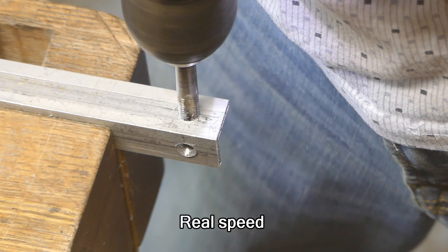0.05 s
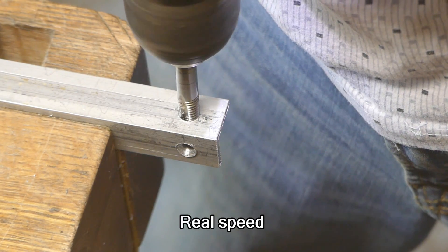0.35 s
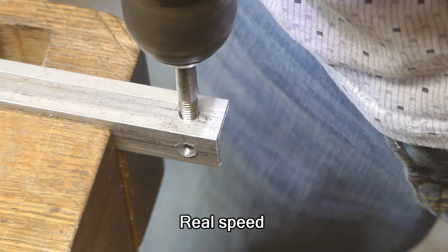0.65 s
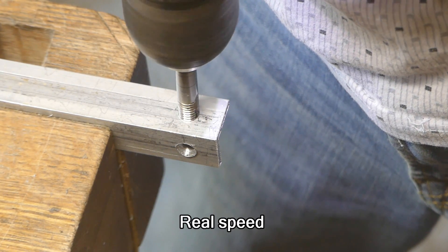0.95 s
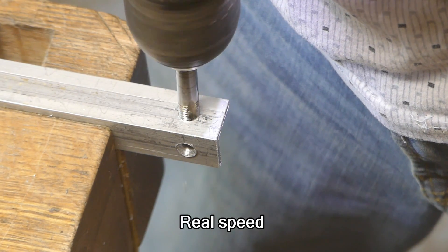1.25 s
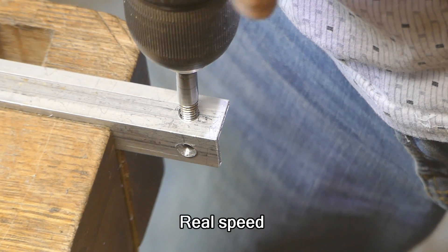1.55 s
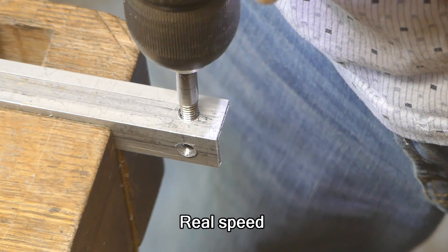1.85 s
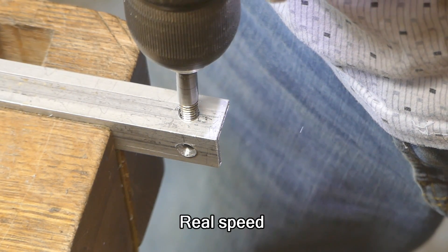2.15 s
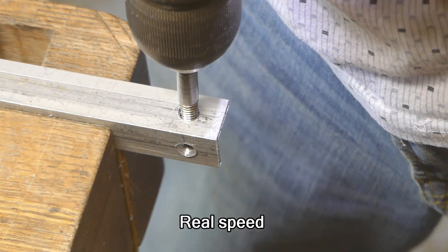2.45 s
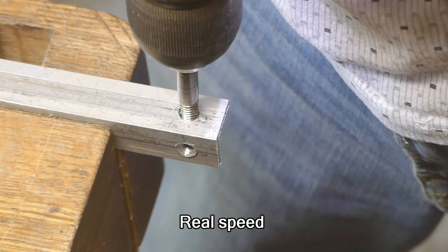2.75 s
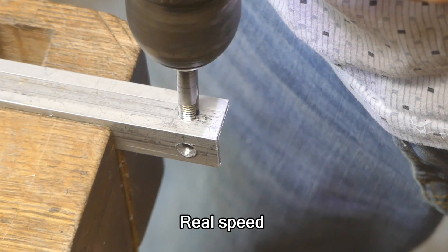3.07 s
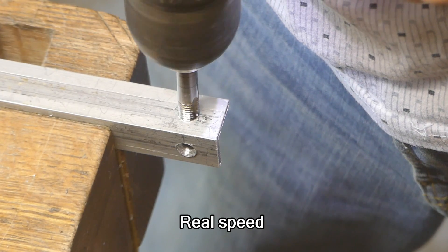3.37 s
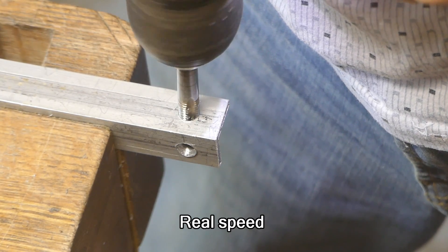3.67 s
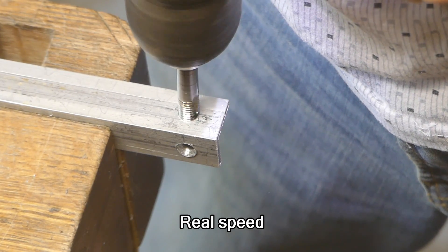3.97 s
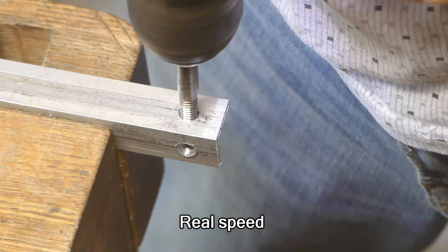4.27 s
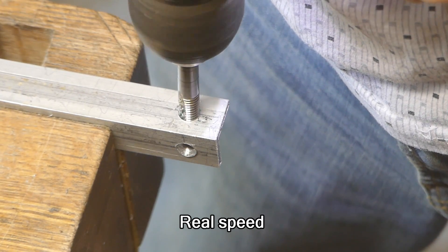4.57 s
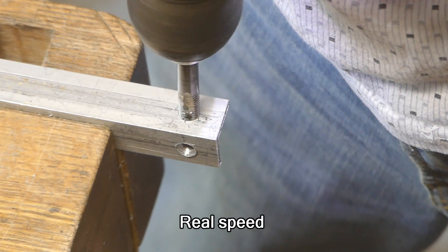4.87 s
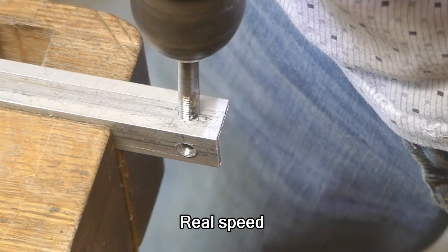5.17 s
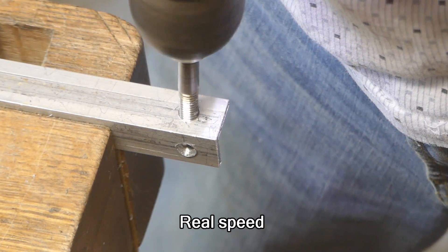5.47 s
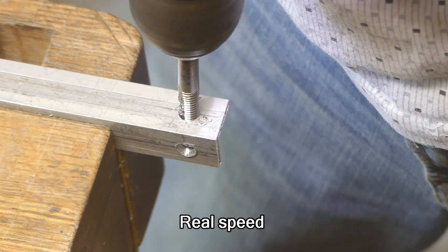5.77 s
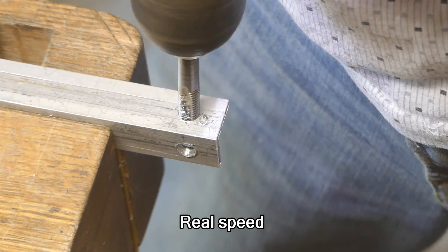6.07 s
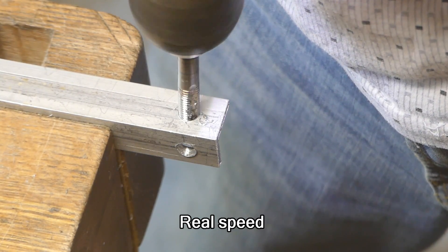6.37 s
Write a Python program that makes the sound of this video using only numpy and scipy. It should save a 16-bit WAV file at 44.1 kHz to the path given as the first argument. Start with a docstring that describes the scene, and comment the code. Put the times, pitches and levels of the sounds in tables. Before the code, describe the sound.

A handheld electric drill runs with a high, raspy whine as it taps a thread in metal, then stops quickly. In the short pause come a soft finger rub and a few plastic clicks over faint room noise. The drill backs out, slower at first, then flat out, the gears groaning and grinding about twice a second. The microphone is close, in a small workshop with a short echo.

```python
"""Cordless drill cutting a thread

Close by in a small workshop, a drill drives a tap (a thread cutter) into an aluminium bar and brakes.
A finger slides to the reversing switch and snaps it over. The drill backs out, first at part trigger,
then flat out. The gears whine over the scrape of the brushes. The tap drags about once in each turn
of the chuck, slowing the motor, and flat out each drag makes the gears groan."""
import sys
import numpy as np
from scipy import signal
from scipy.fft import rfft, irfft
from scipy.io import wavfile
from scipy.ndimage import uniform_filter1d

SR = 44100
rng = np.random.default_rng(int(sys.argv[2]) if len(sys.argv) > 2 else 0)


def wav_out(sig):
    """Save sig, one row per channel (or a flat mono array), as 16-bit PCM at SR to the path in sys.argv[1]."""
    wavfile.write(sys.argv[1], SR, np.round(np.clip(np.atleast_2d(sig).T, -1, 1) * 32767).astype(np.int16))


N = 287532
T, HZ = np.arange(N) / SR, np.fft.rfftfreq(N, 1 / SR)
RELEASE_S, BRAKE_S, RESTART_S, FULL_TRIGGER_S = 1.4, 1.433, 2.747, 3.82
# Settings in threes follow the three stages: running in, out at part trigger, out flat out.
FREE_TURNS_PER_S, DRILL_DB = (120.44, 87.4, 122.65), (-23.5, -21, -22)

# tones of the fan, commutator and gears: multiple of the motor speed, level/dB in each stage
WHINE_TONES = [(1, -38, -46, -39), (2.16, -40, -35, -31), (7, -25.5, -36, -38), (9.4, -30, -36, -28),
               (10, -17.5, -19, -19.5), (10.38, -21, -25, -19), (13, -25, -39, -40), (19, -25, -40, -24),
               (20, -19.5, -19, -16.5), (29, -21, -33, -40), (30, -16, -18, -16), (30.3, -18, -20, -22),
               (38, -21, -40, -35), (40, -10.5, -16.5, -16), (40.8, -22, -27, -23), (47, -19, -36, -40),
               (50, -17, -19, -23), (51, -21, -40, -33), (60, -21, -17, -24), (70, -20, -21, -26),
               (80, -13, -19, -18), (81, -20, -38, -27), (90, -16, -33, -27), (100, -16, -19.5, -32),
               (110, -17, -21, -37), (120, -27, -27, -40)]
# housing resonances that boost a tone passing through: f/Hz, width/Hz, boost/dB
HOUSING_BOOSTS = [(838, 22, 6.5), (3495, 35, 10), (4880, 70, 6.5), (5040, 45, 4.5)]
# tone colour of the scrape through the housing: f/Hz, level/dB in each stage
SCRAPE_COLOUR = [(30, -38.5, -45, -45), (100, -17.5, -22, -26), (255, -14.5, -13.5, -14),
                 (770, -13, -11, -9), (1320, -7, -6.5, -6), (2270, -8, -3, -1), (2600, -8, -6, -4),
                 (4040, -5, -2.5, -1), (4560, -2.5, 2, 0.5), (6100, -4.5, -5.5, -3), (8600, -12, -6, -5.5),
                 (9760, -6.5, -3, -0.5), (11670, -12.5, -8.5, -8.5), (13500, -9.5, -7, -7),
                 (16500, -24, -17, -20.5)]
# part of the scrape that repeats with each motor turn: f/Hz, share of power
REPEATING_SHARE = [(300, 0.11), (1000, 0.39), (4500, 0.11), (7500, 0.4), (15000, 1)]
# housing resonances rung by the running motor: f/Hz, width/Hz, level/dB
HOUSING_RINGS = [(479, 8.7, -29), (844, 4, -23), (3495, 20, -33), (4454, 44, -18)]
# the tap binds: hardest pull t/s, length/s, speed lost/(turns per s), surge in loudness/dB
TAP_DRAGS = [(0.01, 0.48, 1.82, 1.2), (0.388, 0.5, 0.97, 0), (0.982, .29, 0.78, 0.4), (1.51, .62, 1.9, 0.9),
             (2.919, .19, 1.73, 0.2), (3.199, 0.17, 0.72, .3), (3.55, 0.39, 3.87, -0.1),
             (4.125, 0.26, 5.22, 1.5), (4.624, .4, 4.85, 1.3), (5.135, 0.47, 5.35, 2),
             (5.6, .33, 4.13, 2.5), (6.085, 0.38, 5, 2), (6.6, 0.46, 5.5, 2)]
# resonances strained by a drag: f/Hz, width/Hz, level/dB
GROAN_RINGS = [(1249, 8.3, -4), (1310, 160, -2)]
# resonances of gears grinding under load: f/Hz, width/Hz, level/dB
GRIND_RINGS = [(2335, 43, -31), (3370, 110, -38.5), (4900, 340, -33)]
# brief changes in the drill's midrange, nearly all dips: t/s, length/s, change/dB
MIDRANGE_LULLS = [(0.41, .06, 1), (0.76, 0.17, -4), (0.885, .07, -9), (1.24, 0.14, -4), (2.935, 0.082, -2),
                  (3.12, 0.057, -3.5), (3.32, .06, -1.5), (5.79, 0.18, -0.5)]
# clicks of the reversing switch and trigger: t/s, level/dB, ring time/s, treble tilt/(dB per octave)
SWITCH_CLICKS = [(1.681, -56, .03, -11), (1.758, -57, 0.016, -2), (1.7617, -34, 0.0037, 1.5),
                 (1.7652, -50, .012, -13), (1.788, -42, 0.016, -2), (2.668, -65, 0.019, 0),
                 (2.703, -52.5, 0.018, -7), (2.7494, -47, 0.031, -4)]
# tone colour of the drill's plastic shell: f/Hz, level/dB
SHELL_COLOUR = [(120, -51), (400, -11), (700, -5), (1600, -3.5), (2900, 2), (4400, -5.5), (6100, -7),
                (7800, -10), (9200, -9), (12500, -18), (15500, -17)]
# tone colour of skin sliding on plastic: f/Hz, level/dB
FINGER_COLOUR = [(1500, -15), (2600, -18), (3200, -4), (3850, -3), (4400, -19), (8000, -30)]
# loudness along the finger's slide: t/s, level/dB
SLIDE_LEVELS = [(1.56, -52), (1.6, -52), (1.645, -47.5), (1.7, -69), (1.75, -57)]
# tone colour of the workshop's background noise: f/Hz, level/dB
WORKSHOP_COLOUR = [(15, -74), (25, -44), (64, -28), (82, -7.5), (129, -9), (227, -10.5), (289, -5.5),
                   (399, -10), (469, -18), (509, -2.5), (552, -8.5), (666, -13), (970, -15.5),
                   (2120, -27.5), (15500, -38)]
# a faint hum comes and goes: t/s, length/s, level/dB
HUM_PEAKS = [(1.599, 0.13, -54), (1.803, 0.12, -54), (2.09, 0.37, -51.5), (2.72, 0.34, -56)]
# how long the room echoes: f/Hz, t/s to fade by 60 dB
ECHO_TIMES = [(150, 0.72), (600, 0.34), (2500, 0.32), (7000, 0.28), (15000, 0.16)]
# how alike the room sounds on the left and right: f/Hz, likeness (1 = the same)
STEREO_LIKENESS = [(80, -0.21), (250, 0.089), (700, 0.17), (3000, 0.56), (14000, 0.4)]


def motor_speed(stop_s=.16, spin_up_s=.06, lowest_share=.1):
    """Turns a second: the trigger sets the free speed, the tap drags it down, the brake slows it."""
    wind_down = 1 - np.clip((T - RELEASE_S) / stop_s, 0, 1) ** 2
    run_up = 1 - (1 - np.clip((T - RESTART_S) / spin_up_s, 0, 1)) ** 2
    return (np.dot(FREE_TURNS_PER_S, stages()) - tap_sag()) * np.maximum(wind_down + run_up, lowest_share)


def motor_turns(flutter=(.0004, .0013, .0032)):
    """Angle of the motor in turns; the gears chatter more in reverse."""
    return np.cumsum(motor_speed() * (1 + np.dot(flutter, stages()) * wander(70))) / SR


def motor_gain(kick_db=4.5, kick_s=.076, brake_db_per_s=306, rise_db_per_s=.1):
    """Load makes the drill louder, the brake cuts it, and each new squeeze of the trigger gives a kick."""
    running_db = np.dot(DRILL_DB, stages()) + tap_surge_db(lead_s=.075) + rise_db_per_s * flat_out_s()
    kicks = sum((T > s) * np.exp(-abs(T - s) / kick_s) for s in (RESTART_S, FULL_TRIGGER_S))
    brake_db = -brake_db_per_s * np.maximum(T - BRAKE_S, 0)
    run_up_db = -20 * np.clip(1 - (T - RESTART_S) / .044, 0, 1)
    return amp(running_db + kick_db * kicks + np.where(T < RESTART_S, brake_db, run_up_db))


def gear_whine(turns, stage_db=(.2, .6, .6), waver_db=(1, 2, 2.5), off_centre=.25, rattle=(.25, .3, .4)):
    """Tones follow the motor; an off-centre rotor sways them once a turn and loose gears roughen them."""
    weights, speed, out = stages(), motor_speed(), np.zeros(N)
    # the teeth only mesh cleanly while the speed is steady
    change_per_s = uniform_filter1d(abs(np.gradient(np.log(speed))) * SR, 1500)
    steady = 1 / (1 + (change_per_s / 3.7) ** 2)
    # flat out, the high tones start strong and then fade
    whistle_db = weights[2] * (1.7 - 2.6 * flat_out_s())
    for multiple, *levels in WHINE_TONES:
        pitch_hz = multiple * speed
        boost_db = sum(db / (1 + ((pitch_hz - hz) / width) ** 2) for hz, width, db in HOUSING_BOOSTS)
        boost_db += whistle_db * (pitch_hz > 4400)
        gain = (amp(levels) @ weights) * amp(boost_db + np.dot(waver_db, weights) * wander(14))
        sway = off_centre * np.cos(2 * np.pi * (turns + rng.random()))
        roughness = np.dot(rattle, weights) * wander(110)
        tone = np.sqrt(2) * np.sin(2 * np.pi * (multiple * turns + rng.random()))
        out += gain * (1 + sway + roughness) * tone
    return steady * amp(np.dot(stage_db, weights)) * out


def brush_scrape(turns, stage_db=(-2.5, -2, -1.5), regularity=(1, .35, .3), grain_db=2.5, size=4096):
    """The motor's brushes rub over the same bumps every turn, mixed with fresh grit and fan air."""
    one_turn = irfft(np.r_[0, np.exp(2j * np.pi * rng.random(170))], size)  # 170 equal harmonics
    buzz = rfft(unit(np.interp(turns % 1 * size, np.arange(size), one_turn)))
    throb = 1 + .1 * np.cos(2 * np.pi * turns)
    grit = rfft(unit(rng.standard_normal(N) * amp(grain_db * wander(900)) * throb))
    table, out = np.array(SCRAPE_COLOUR), np.zeros(N)
    for k, weight in enumerate(stages()):
        share = np.clip(regularity[k] * read(REPEATING_SHARE, HZ), 0, 1)
        mixed = irfft(np.sqrt(share) * buzz + np.sqrt(1 - share) * grit, N)
        voiced = weight * colour(mixed, table[:, [0, k + 1]])
        out += amp(stage_db[k]) * unit(voiced) * np.sqrt(np.mean(weight ** 2))
    return out


def lulls(x, centre_hz=3680, width_hz=1500):
    """The midrange dips for a moment here and there, and once lifts slightly."""
    middle = irfft(rfft(x) / (1 + ((HZ - centre_hz) / width_hz) ** 4), N)
    return x + (amp(swells(MIDRANGE_LULLS)) - 1) * middle


def tap_sag():
    """Speed the motor loses as the tap binds, in turns a second."""
    return swells([(s, length, lost) for s, length, lost, _ in TAP_DRAGS])


def tap_surge_db(lead_s):
    """Extra loudness of each drag, a moment before the speed sags."""
    return swells([(s, length, db) for s, length, _, db in TAP_DRAGS], T + lead_s)


def gear_groan(base_db=-44, surge_scale=6.46, growth_db_per_s=1.35, grind_db=.5):
    """Flat out, the loaded gears groan at each drag, more as time goes on, and grind as the motor sags."""
    strain = amp(base_db + surge_scale * tap_surge_db(lead_s=.093) + growth_db_per_s * flat_out_s())
    load = tap_sag() / 5  # a hard pull costs about 5 turns a second
    return stages()[2] * (strain * ring(GROAN_RINGS) + amp(grind_db) * load * ring(GRIND_RINGS))


def switch_clicks(snap=.72, size=4096):
    """Each click is a snap and a short burst of noise ringing in the plastic shell."""
    out, t, hz = np.zeros(N), T[:size], np.fft.rfftfreq(size, 1 / SR)
    treble_octaves = np.log2(np.maximum(hz, 1500) / 1500)
    for s, db, ring_s, tilt_db in SWITCH_CLICKS:
        noise = unit(rng.standard_normal(size) * amp(-60 * t / ring_s))
        burst = snap + rfft(noise) / np.sqrt(size)
        log_gain = np.log(amp(read(SHELL_COLOUR, hz) + tilt_db * treble_octaves))
        # a minimum-phase filter: the shell rings only after the hit
        mirrored = np.r_[log_gain, log_gain[-2:0:-1]]
        shell = np.exp(np.conj(signal.hilbert(mirrored)))[:len(hz)]
        out[round(s * SR):][:size] += amp(db) * unit(irfft(burst * shell))
    return out


def finger_slide(trim_db=-1, grain_db=3):
    """A finger rubs over the housing towards the switch, making a grainy hiss."""
    touch = np.interp(T, [1.54, 1.58, 1.73, 1.76], [0, 1, 1, 0])
    level_db = np.interp(T, *np.transpose(SLIDE_LEVELS)) + trim_db + grain_db * wander(90)
    return touch * amp(level_db) * colour(rng.standard_normal(N), FINGER_COLOUR)


def room(x, echo_db):
    """Adds echoes whose pattern drifts as the hand-held drill moves."""
    drift = 2 * np.pi * T + wander(2)
    echoes = stereo(reflections(x * np.cos(drift)) + reflections(x * np.sin(drift)))
    return (x + amp(echo_db) * echoes) / np.hypot(1, amp(echo_db))


def reflections(x, echoes_per_s=4000):
    """Two sets of scattered echoes that die faster in the treble."""
    echoes = rng.standard_normal((2, SR)) * (rng.random(SR) < echoes_per_s / SR) * (T[:SR] > .003)
    hz, t, spectra = signal.stft(echoes, SR, nperseg=256)
    decay = amp(-60 * t / read(ECHO_TIMES, hz)[:, None])
    tail = signal.istft(spectra * decay, SR, nperseg=256)[1]
    return signal.fftconvolve(x[None], tail / np.linalg.norm(tail[0]), axes=1)[:, :N]


def workshop(noise_db=-47, hum_hz=522):
    """Soft noise from all around, with a faint wavering hum that comes and goes."""
    hum = np.sqrt(2) * np.sin(2 * np.pi * np.cumsum(hum_hz + 3 * wander(24.8)) / SR)
    hum_power = swells([(s, length, amp(db) ** 2) for s, length, db in HUM_PEAKS])
    noise = colour(stereo(rng.standard_normal((2, N))), WORKSHOP_COLOUR)
    return amp(noise_db) * noise + np.sqrt(hum_power) * hum


def stages():
    """Weights from 0 to 1 for running in, out at part trigger and out flat out."""
    reverse = 1. * (T > RESTART_S - .1)
    full = np.clip((T - FULL_TRIGGER_S) / .05 + .5, 0, 1)
    return np.array([1 - reverse, reverse - full, full])


def flat_out_s():
    """Time since the trigger was pulled all the way."""
    return np.maximum(T - FULL_TRIGGER_S, 0)


def swells(rows, t=T, rise_share=.39):
    """Adds up straight rises and falls, one for each row of peak t/s, length/s, height."""
    corners = [-rise_share, 0, 1 - rise_share]
    return sum(height * np.interp((t - s) / length, corners, [0, 1, 0]) for s, length, height in rows)


def amp(db):
    """Turns decibels into a gain."""
    return 10 ** (np.asarray(db) / 20)


def unit(x):
    """Scales x to an average strength (rms) of 1."""
    return x / np.sqrt(np.mean(x ** 2) + 1e-20)


def read(rows, hz):
    """Looks up a table of f/Hz, value on a log-frequency axis."""
    f, value = np.transpose(rows)
    return np.interp(np.log(hz + 1), np.log(f + 1), value)


def colour(x, rows):
    """Filters x by a table of f/Hz, level/dB and scales it to strength 1."""
    return unit(irfft(rfft(x) * amp(read(rows, HZ)), N))


def wander(rate_hz):
    """A smooth random wobble of strength about 1, moving at up to about rate_hz."""
    count = int(8 * rate_hz * N / SR)
    hz = np.fft.rfftfreq(count, N / SR / count)
    slow = irfft(rfft(rng.standard_normal(N)[:count]) / (1 + (hz / rate_hz) ** 4), count)
    return np.interp(T, np.linspace(0, T[-1], count), unit(slow))


def ring(resonances):
    """Noise ringing in resonances given as f/Hz, width/Hz, level/dB."""
    return sum(amp(db) * unit(irfft(rfft(rng.standard_normal(N)) / (1 + ((HZ - hz) / width) ** 2), N))
               for hz, width, db in resonances)


def stereo(two):
    """Blends two unrelated signals like sound reaching two close microphones from all around."""
    left, other = rfft(two)
    same = np.clip(read(STEREO_LIKENESS, HZ), -1, 1)
    return irfft(np.array([left, same * left + np.sqrt(1 - same ** 2) * other]), N)


def scene():
    """The drill and its switches in the room, over the background."""
    turns, gain = motor_turns(), motor_gain()
    whine = room(lulls(gain * gear_whine(turns)), echo_db=-10)
    scrape = gain * (brush_scrape(turns) + ring(HOUSING_RINGS))
    rasp = room(lulls(scrape) + gear_groan(), echo_db=-4)
    handling = room(switch_clicks() + finger_slide(), echo_db=-.5)
    return whine + rasp + handling + workshop()


def record(dry, balance_db=-.7, bass_hz=48, dip_hz=7750, dip_width_hz=330, dip_db=-4, top_hz=15850):
    """The sound lacks the deepest bass and highest treble, and dips slightly near 7.7 kHz."""
    bass_cut = HZ ** 2 / np.hypot(HZ ** 2, bass_hz ** 2)
    dip = amp(dip_db / (1 + ((HZ - dip_hz) / dip_width_hz) ** 2))
    heard = irfft(rfft(dry) * bass_cut * dip, N) * amp([[balance_db / 2], [-balance_db / 2]])
    low_pass = signal.firwin(511, top_hz, window=("kaiser", 9), fs=SR)
    return signal.oaconvolve(heard, low_pass[None], "same")


dry = scene()
out = record(dry)
wav_out(out)
```